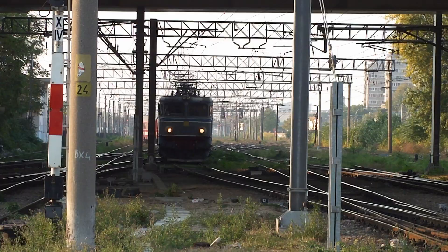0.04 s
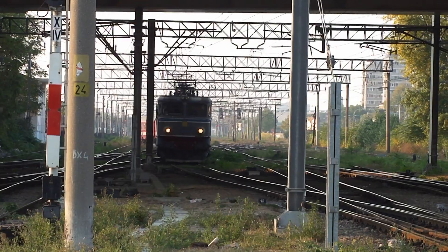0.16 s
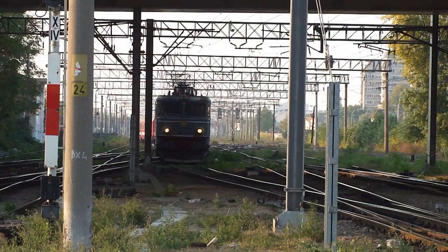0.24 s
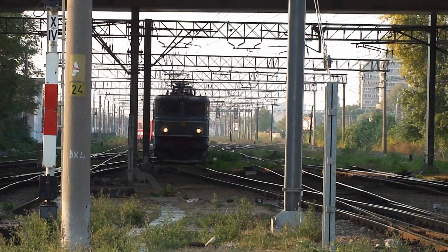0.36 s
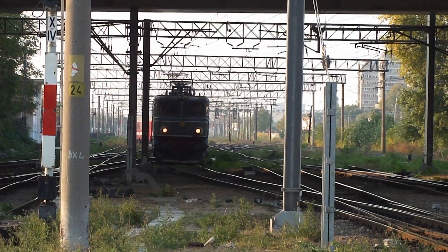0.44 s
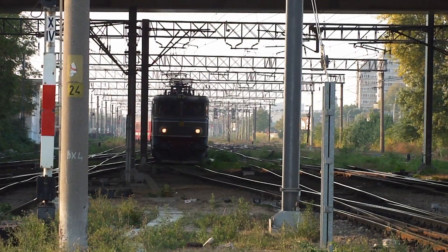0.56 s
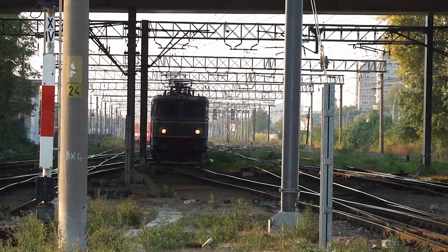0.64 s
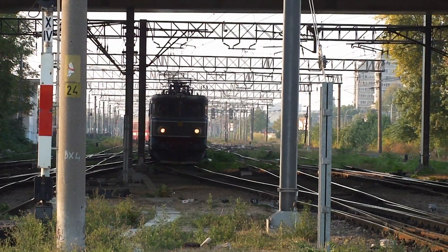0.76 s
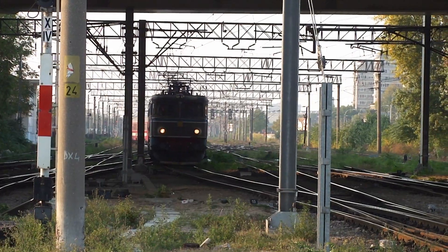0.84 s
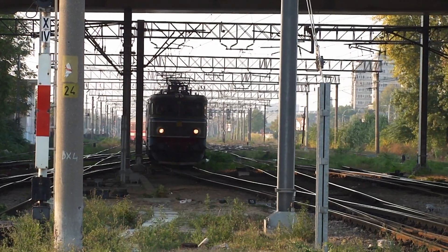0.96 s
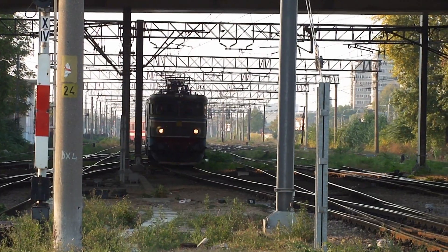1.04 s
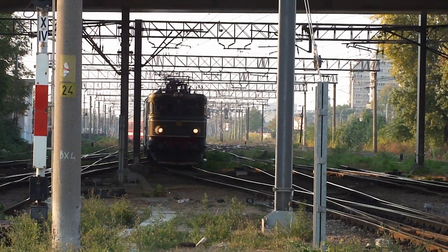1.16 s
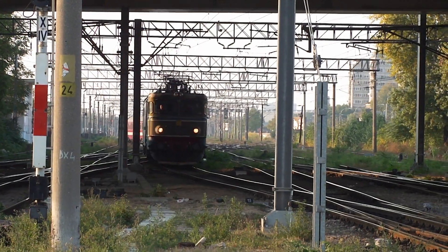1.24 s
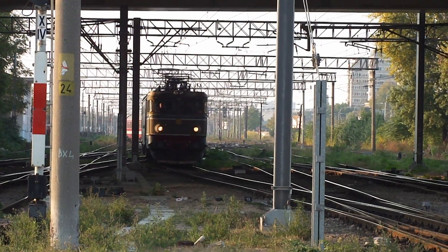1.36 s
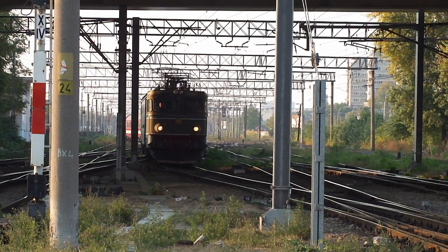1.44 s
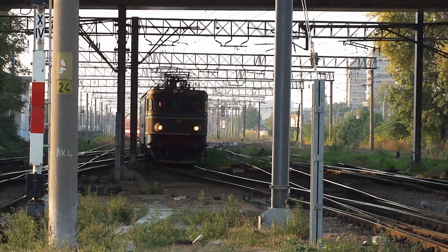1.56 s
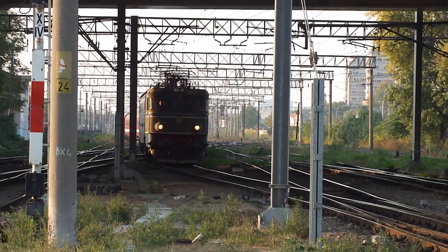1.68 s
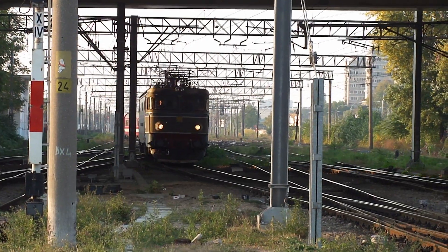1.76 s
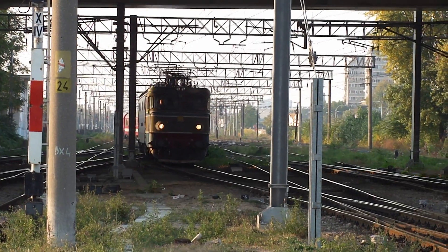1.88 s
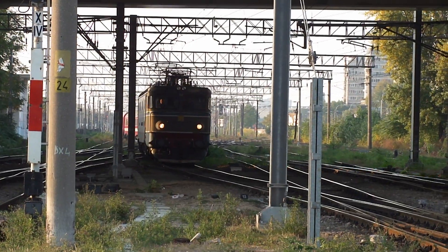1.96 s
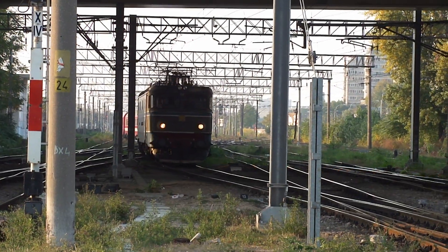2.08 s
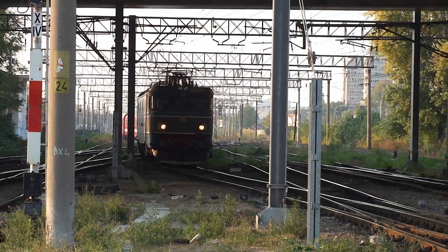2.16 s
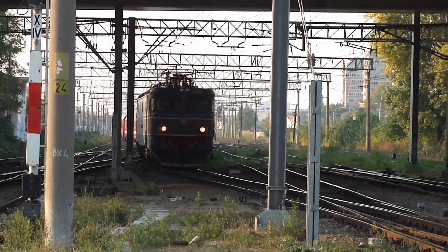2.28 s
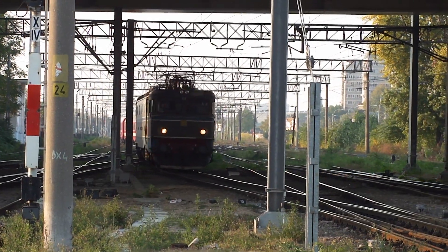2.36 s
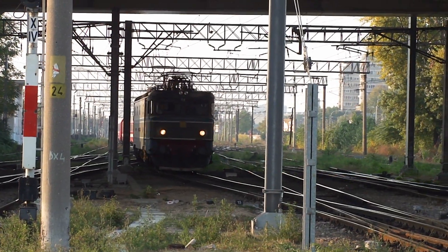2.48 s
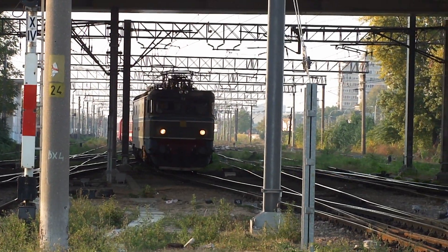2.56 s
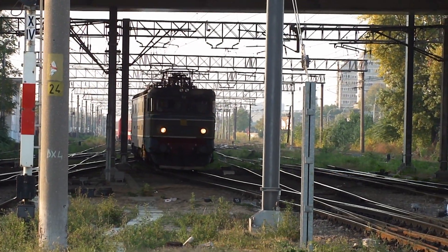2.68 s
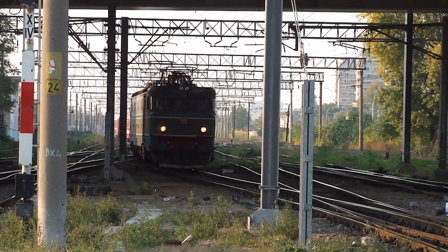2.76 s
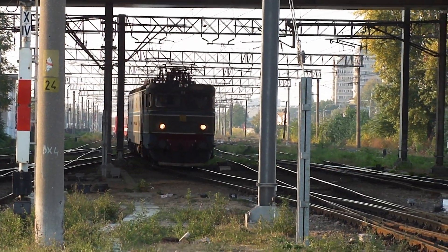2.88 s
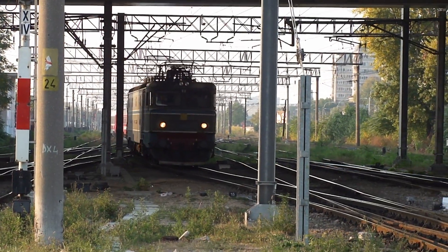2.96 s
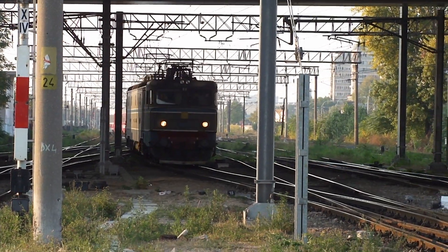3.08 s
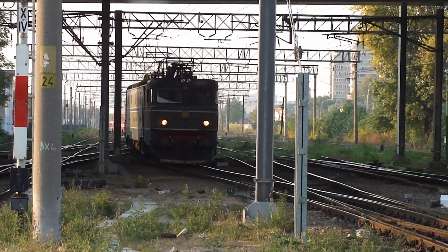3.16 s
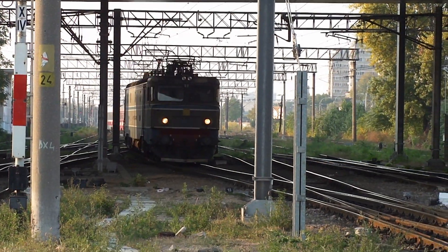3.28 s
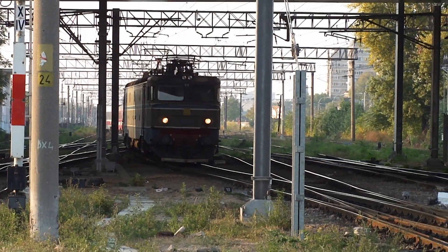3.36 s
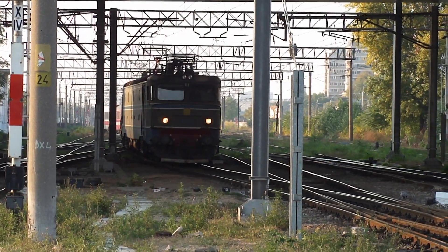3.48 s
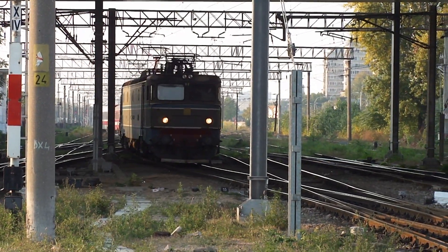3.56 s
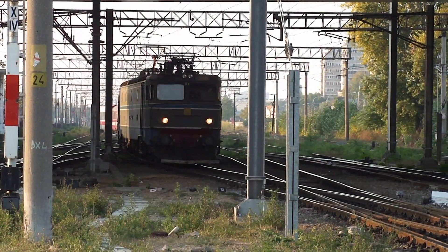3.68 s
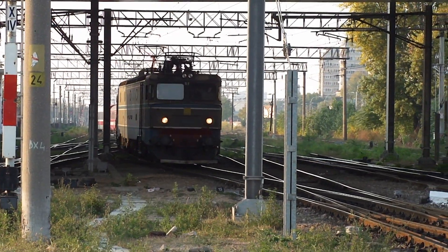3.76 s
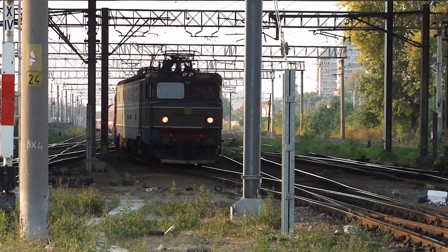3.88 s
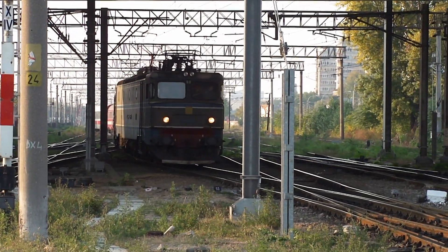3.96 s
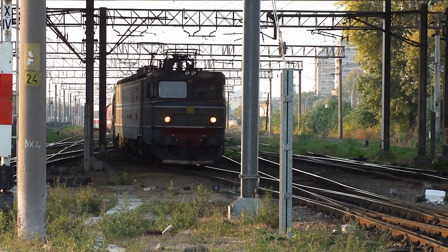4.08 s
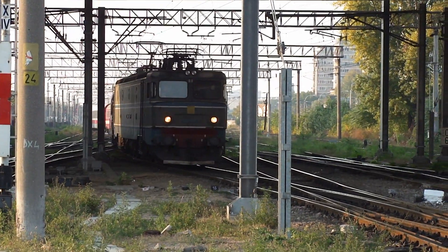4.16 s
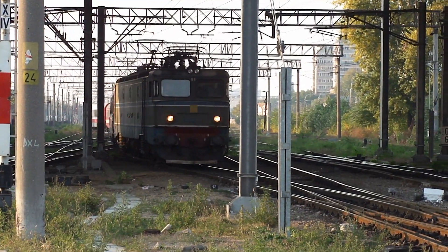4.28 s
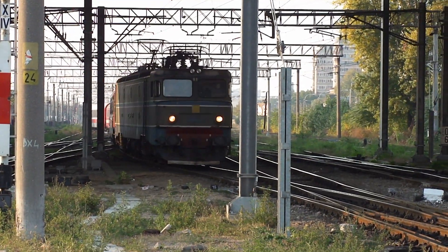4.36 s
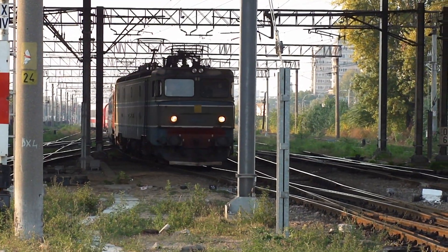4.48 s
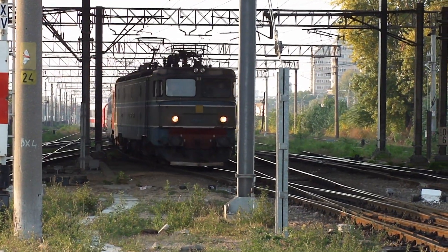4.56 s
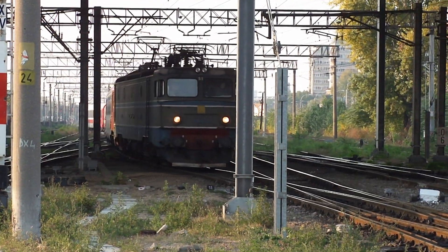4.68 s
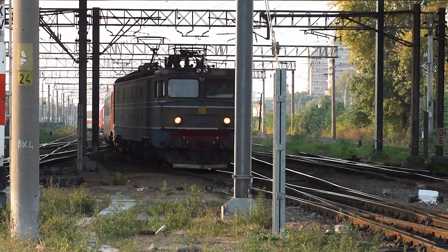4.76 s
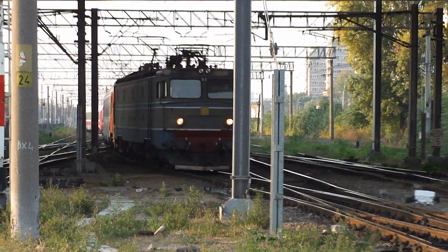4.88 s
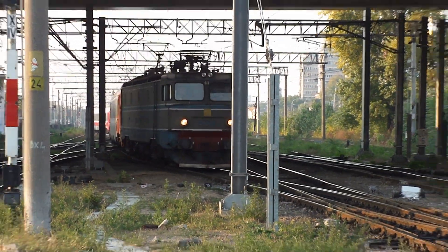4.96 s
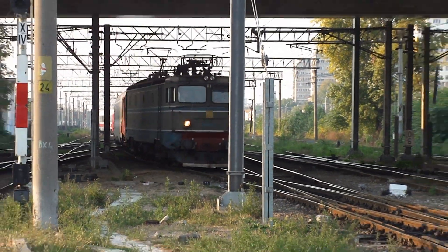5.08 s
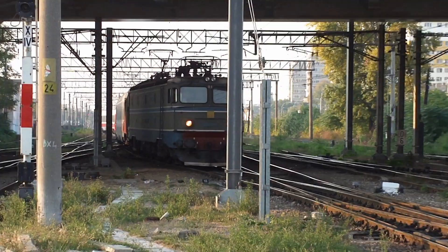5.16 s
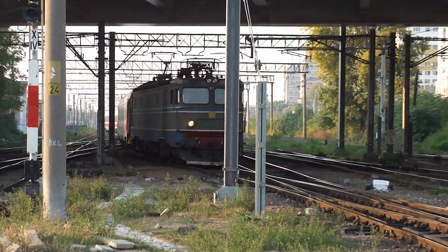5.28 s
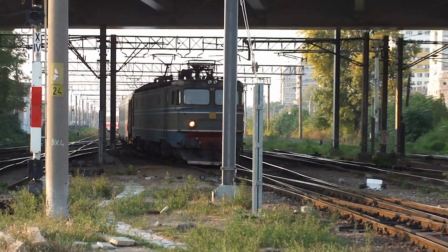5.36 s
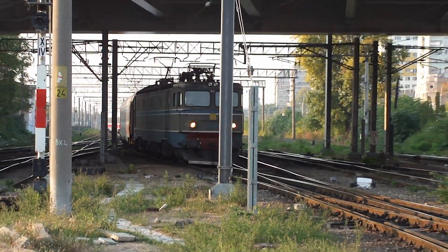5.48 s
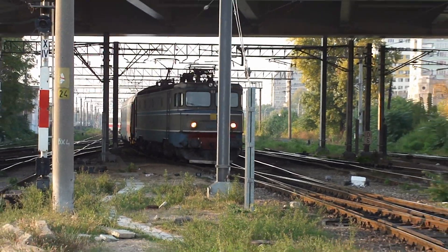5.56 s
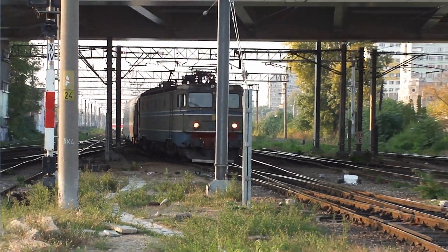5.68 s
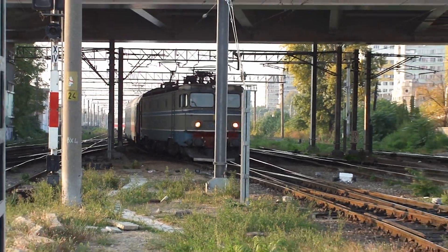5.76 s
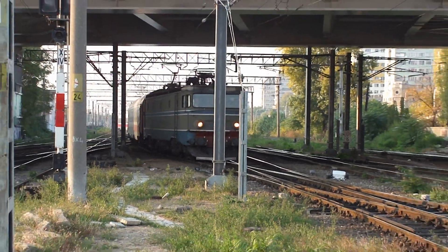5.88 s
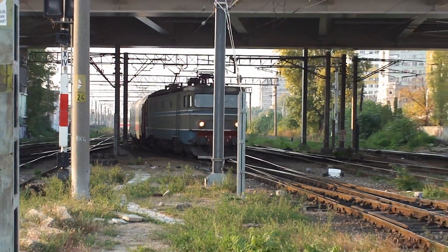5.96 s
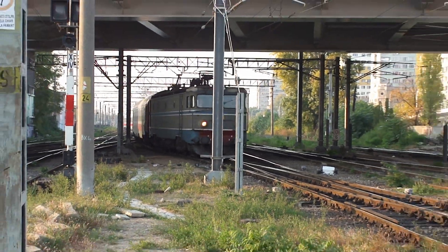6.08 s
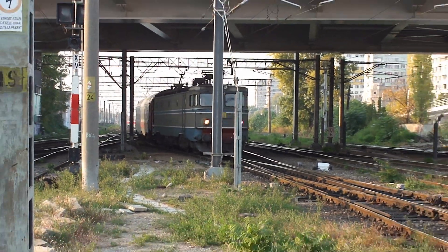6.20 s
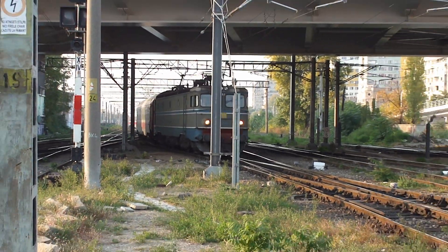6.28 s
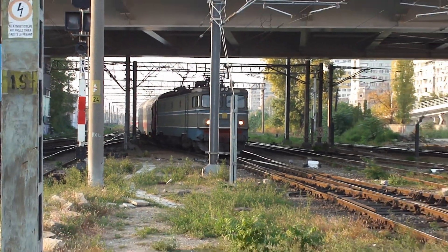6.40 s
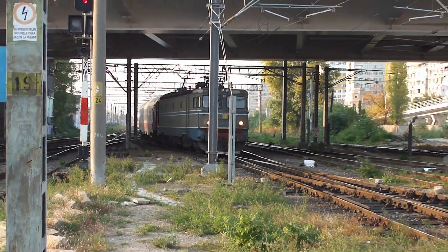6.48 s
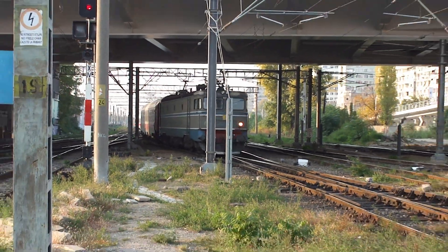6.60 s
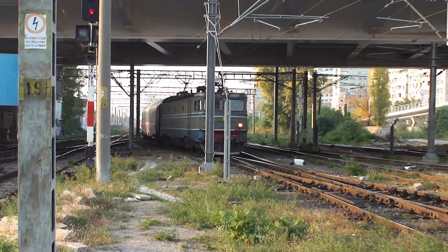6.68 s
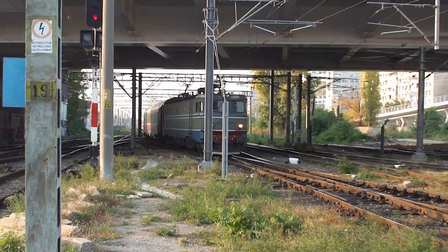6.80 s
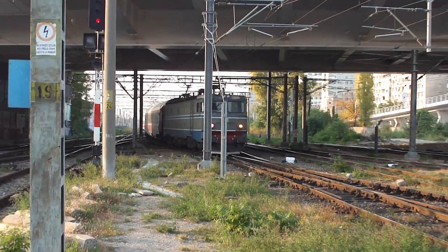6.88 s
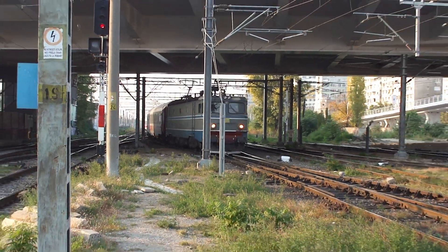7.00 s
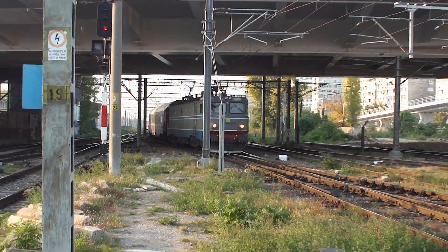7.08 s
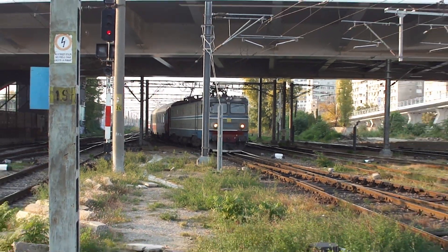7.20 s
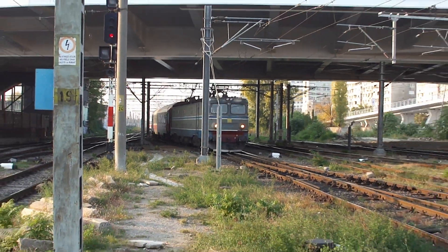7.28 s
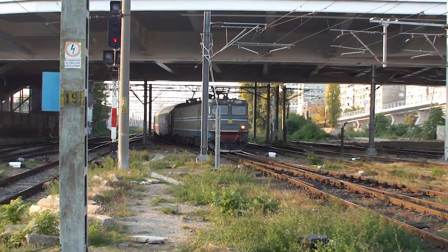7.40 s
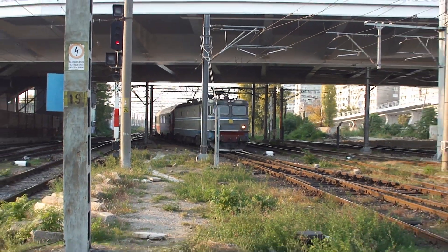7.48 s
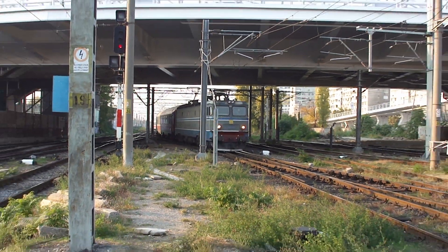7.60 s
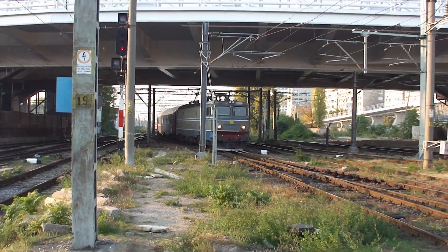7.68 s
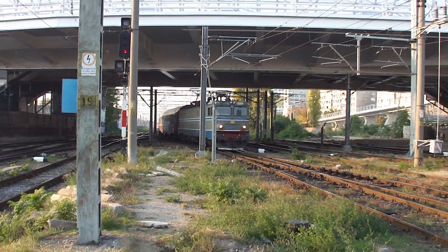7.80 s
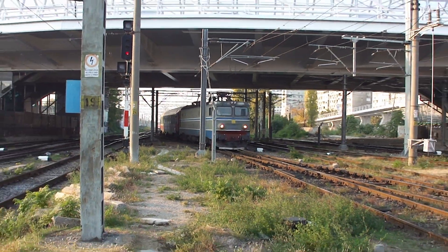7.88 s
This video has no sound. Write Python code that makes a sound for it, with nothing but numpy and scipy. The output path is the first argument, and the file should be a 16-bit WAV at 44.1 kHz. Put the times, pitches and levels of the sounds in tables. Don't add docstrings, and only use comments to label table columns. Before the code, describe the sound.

A slow electric locomotive rumbles and roars steadily closer under a road bridge, with flange hiss, faint chirps, metallic clanks and a thin left-side buzz.

```python
import sys
import numpy as np
from scipy import signal
from scipy.fft import rfft, irfft, next_fast_len
from scipy.io import wavfile
from scipy.ndimage import uniform_filter1d, map_coordinates

SR = 44100
rng = np.random.default_rng(int(sys.argv[2]) if len(sys.argv) > 2 else 0)


def transcribe(signal):
    frames = np.atleast_2d(signal).T
    limited = np.clip(frames, -1, 1)
    pcm = np.round(limited * 32767).astype(np.int16)
    wavfile.write(sys.argv[1], SR, pcm)


def volts_from_db(level):
    exponent = np.asarray(level, float) / 20
    return 10 ** exponent


N = 349933

# t/s, loudness over the start/dB
NEARNESS = [(0, 0), (.7, 0.15), (1.4, 1.1), (1.8, 2), (2.6, 2.5), (3.3, 3), (4.1, 4), (4.4, 5), (5.1, 5.5),
            (5.8, 6), (6.3, 7), (6.9, 8), (7.5, 8), (7.93, 9)]
# t/s, peak level/dB, centre f/Hz, left minus right/dB, added rub/dB
CLANKS = [(0.5866, -37, 5530, 4.0, 1), (0.9494, -43, 5760, 6.0, 2), (1.52, -42, 5700, 11, 1),
          (1.9194, -52, 5670, 4.5, 4), (2.0223, -45, 6220, -3, 1), (2.1111, -39, 5780, 10, .3),
          (2.1894, -36, 7500, 8, 1), (2.6194, -54, 7820, 8, 1.5), (3.05, -48, 5800, 5, 0.5),
          (3.2794, -44, 5920, 3.0, 1.5), (3.8294, -44, 6310, 4.0, 2.5), (3.907, -45, 9600, 3.5, -0.3),
          (4.2827, -33, 6580, 1, 4), (4.9302, -33, 6190, 10, 1), (5.9738, -31, 6720, 8, 1.5),
          (6.259, -27, 7000, 3.0, 5), (6.6194, -37, 6670, 3.5, 4), (6.9494, -37, 6610, 4.0, 3),
          (7.44, -44, 6000, 5, 1.5), (7.8, -46, 6000, 3, 0)]
# f/Hz, level/dB
HISS_SHAPE = [(4700, -49), (5100, -7), (5600, 1), (6500, 0), (7500, -3.5), (9000, -8), (10500, -17.5),
              (11500, -29), (12000, -58)]
# t/s, level/dB
LENS_MOTOR = [(4.92, -95), (4.935, -52), (5.3, -52.5), (7.93, -56)]


def unit(x):
    return x / np.sqrt(np.mean(x ** 2) + 1e-20)


def along(points, hz):
    f, v = np.transpose(points)
    return np.interp(np.log(hz + 1), np.log(f + 1), v)


def spectrum(points):
    return lambda hz: volts_from_db(along(points, hz))


def curves(rows):
    s, *cols = np.transpose(rows)
    return [np.interp(np.arange(N) / SR, s, c) for c in cols]


def wobble(rate_hz):
    knots = rng.standard_normal(int(N * rate_hz / SR) + 4)
    return map_coordinates(knots, [np.arange(N) * rate_hz / SR])


def filtered(x, response):
    m = next_fast_len(N + SR // 4)
    return irfft(rfft(x, m) * response(np.fft.rfftfreq(m, 1 / SR)), m)[..., :N]


def rush(gain, alike, patchy_db):
    z = signal.stft(rng.standard_normal((2, N)), nperseg=512)[2]
    field = uniform_filter1d(rng.standard_normal(z.shape[1:]), size=4, axis=0)
    field = uniform_filter1d(field, size=16, axis=1)
    pair = signal.istft(z * volts_from_db(patchy_db * unit(field)), nperseg=512)[1][:, :N]

    def mid_side(hz):
        turn = np.arccos(np.clip(along(alike, hz), -1, 1)) / 2
        return gain(hz) * [np.cos(turn), np.sin(turn)]

    mid, side = filtered(pair, mid_side)
    return np.array([mid + side, mid - side]) / np.std(mid)


def pan(db):
    return volts_from_db(np.array([db / 2, -db / 2]))


def jolts():
    rub_s = 0.1
    s = np.arange(N) / SR
    return sum(rub_db * (s > at) * np.exp(-abs(s - at) / rub_s) for at, _, _, _, rub_db in CLANKS)


def rolling():
    # f/Hz, level per Hz/dB
    bogie = [(20, -59), (50, -21.5), (90, -13), (170, -2.5), (215, -0.5), (320, 0), (400, -3), (600, -67)]
    rail = [(220, -56.5), (330, -8.5), (460, -1), (520, -1), (600, 0), (645, 1), (700, -0.5), (855, -0.5),
            (885, -14), (1100, -56.5)]
    wheel_web = [(700, -55), (870, -6), (940, -2.5), (1080, -0.5), (1220, -2.5), (1330, -5.5), (1430, -10),
                 (1700, -62.5)]
    wheel_rim = [(1150, -68), (1400, -5), (1550, -1), (1730, 0), (1920, -1.5), (2020, -4.5), (2450, -12.5),
                 (2800, -24.5), (3400, -61)]
    # start level/dB, growth per dB of nearness [dB/dB], left minus right/dB
    body_levels = [
        (-40, 0.5642, 1.8),
        (-31.5, 1.0, 1.75),
        (-33.5, 0.9951, 2),
        (-35.5, 0.86, 1),
    ]
    # f/Hz, left-right likeness [-1..1]
    likeness = [(25, .6), (60, 1), (130, 0.98), (560, 1), (1180, 0.96), (2500, 0.91)]
    # f/Hz, width/Hz, start level/dB, growth per dB of nearness [dB/dB]
    tones = [
        (198.8, 10, -53.5, 0.82),
        (455.4, 18, -52.5, 1.0),
        (635.7, 19, -47.5, 0.96),
        (851.8, 8.6, -54, 1.5),
        (1935, 24, -56, 1.5),
    ]
    # middle t/s, half length/s, gain/dB
    tone_spells = [
        [(1.72, 0.072, 6.5), (4.33, 0.073, 11), (6.76, .15, 9.5), (7.44, .08, 6)],
        [(.66, .1, 14), (6.56, .06, 5), (7.25, 0.12, 5), (7.66, 0.16, 15)],
        [(1.7, .06, 7), (5.03, 0.086, 7.5), (6.48, 0.34, 12), (7.36, 0.1, 15), (7.7, 0.17, 10.5)],
        [(3.0, .3, 7.5), (5.21, 0.071, 9), (6.8, 0.11, 9), (7.1, 0.29, 11), (7.9, .06, 3)],
        [(1.6, 0.1, 12), (5.0, 0.13, 12), (6.0, 0.12, 9), (7.62, 0.13, 11)],
    ]

    near_db, = curves(NEARNESS)
    roar = np.zeros((2, N))
    jolt_shares = (1, .2, .1, .1)
    for (db, grows, lean_db), body, share in zip(body_levels, (bogie, rail, wheel_web, wheel_rim), jolt_shares):
        uneven_db = 0.09 * wobble(5)
        level = volts_from_db(db + grows * near_db + uneven_db + share * jolts())
        roar += level * pan(lean_db)[:, None] * rush(spectrum(body), likeness, patchy_db=0.7)

    s = np.arange(N) / SR
    for (mode_hz, width_hz, db, grows), spells in zip(tones, tone_spells):
        sing_db = sum(gain_db * np.exp(-((s - at) / half_s) ** 4) for at, half_s, gain_db in spells)
        resonance = lambda hz: 1 / (1 + ((hz - mode_hz) * 2 / width_hz) ** 2)
        mode = unit(filtered(rng.standard_normal(N), resonance))
        waver_db = 1.5 * wobble(4)
        roar += volts_from_db(db + grows * near_db + sing_db + waver_db) * mode * pan(1.4)[:, None]
    return roar


def glide(rows, blur_hz, steady=0):
    hz, db = curves(rows)
    s = np.arange(N) / SR
    inside = uniform_filter1d(1. * (s > rows[0][0]) * (s < rows[-1][0]), size=400)
    phase = 2 * np.pi * np.cumsum(hz) / SR
    tone = (steady + wobble(blur_hz)) * np.sin(phase) + wobble(blur_hz) * np.cos(phase)
    return inside * volts_from_db(db) * unit(tone)


def arc(start_s, length_s, low_hz, top_hz, db):
    swing_s, fade_db = .97, 12
    u = np.linspace(0, 1, 30)
    hz = low_hz + (top_hz - low_hz) * np.sin(np.pi * u * length_s / swing_s) ** 2
    return np.transpose([start_s + u * length_s, hz, db - fade_db * (2 * u - 1) ** 4])


def flanges():
    # f/Hz, level/dB
    grit_shape = [(2400, -26.5), (2900, 0), (3500, 1.5), (4500, -3.5), (5200, -6), (5700, -39.5)]
    # start t/s, length/s, low f/Hz, top f/Hz, level/dB
    chirps = [
        (.93, .77, 8300, 9750, -67.5),
        (1.8, .2, 8500, 9600, -75),
        (2.8, .26, 10300, 11500, -76),
        (3.2, .5, 8800, 9450, -69.5),
        (3.8, .3, 9900, 11000, -81),
    ]
    # start t/s, length/s, level/dB
    squeak_bursts = [
        (5.96, .045, -57),
        (6.25, .17, -54),
        (6.615, .15, -52.5),
        (6.93, .21, -54.5),
    ]

    near_db, = curves(NEARNESS)
    rub_db = jolts()
    shake = volts_from_db(0.49 * wobble(9) + 0.44 * wobble(45))

    fizz_level = volts_from_db(-58 + .95 * near_db + rub_db) * pan(4 + .8 * wobble(10))
    fizz_alike = [(5200, .6), (8000, 0.49), (11000, .2)]
    fizz = fizz_level * rush(spectrum(HISS_SHAPE), fizz_alike, patchy_db=0.6)

    grit_level = volts_from_db(-59.5 + 0.75 * near_db + .7 * rub_db + 0.43 * wobble(11)) * pan(1.2)[:, None]
    grit = grit_level * rush(spectrum(grit_shape), [(3000, 0.83), (5000, .5)], patchy_db=0.55)

    arcs = [arc(*c) for c in chirps]
    thin = sum(np.array([glide(c, blur_hz=300), glide(c, blur_hz=300)]) for c in arcs)
    thin = thin * volts_from_db(1.5 + 3 * wobble(45))
    halo = sum(np.array([glide(c, blur_hz=1500), glide(c, blur_hz=1500)]) for c in arcs) * volts_from_db(2)

    squeak_hz = 6665
    bursts = sum(glide([(at, squeak_hz, db), (at + length_s, squeak_hz, db)], blur_hz=200, steady=.5)
                 for at, length_s, db in squeak_bursts)
    squeaks = bursts * volts_from_db(2.3 * wobble(35)) * pan(3.5)[:, None]
    return shake * (fizz + grit) + thin + halo + squeaks


def electronics():
    # f/Hz, level per Hz/dB
    motor_shape = [(5000, -31), (5400, 4), (5800, -3.5), (8000, -10), (10000, -13), (11000, -12.5),
                   (11800, -26)]
    # f/Hz, level/dB
    whine_tones = [
        (7800, -73),
        (7825, -73),
    ]

    frame_hz = 50
    ticks, s = np.zeros(N), np.arange(N) / SR
    ticks[np.round(np.arange(0, N - 1, SR / frame_hz)).astype(int)] = 1
    puffs = np.convolve(ticks, volts_from_db(-60 * s[:300] / .004))[:N] * rng.standard_normal(N)
    buzz = volts_from_db(-61.5) * unit(filtered(puffs, spectrum(HISS_SHAPE)))
    lens = volts_from_db(curves(LENS_MOTOR)[0]) * unit(filtered(rng.standard_normal(N), spectrum(motor_shape)))
    whine = sum(np.sqrt(2) * volts_from_db(db + 5.5 + 2.5 * wobble(8)) * np.sin(2 * np.pi * hz * s)
                for hz, db in whine_tones)
    return np.array([buzz + whine + lens, 0 * s])


def joints():
    crack_t60_s, tail_t60_s = 0.028, 0.18
    out, t = np.zeros((2, N + SR)), np.arange(SR // 4) / SR
    for s, db, hz, lean_db, _ in CLANKS:
        decay = volts_from_db(-60 * t / crack_t60_s) + 0.49 * volts_from_db(-60 * t / tail_t60_s)
        burst = rng.standard_normal((2, len(t))) * decay
        colour = signal.butter(2, [hz * 0.84, min(hz * 1.22, 11600)], "bandpass", fs=SR, output="sos")
        clank = volts_from_db(db - 4.5) * pan(lean_db)[:, None] * signal.sosfilt(colour, burst)
        out[:, round(s * SR):][:, :len(t)] += clank
    return out[:, :N]


def scene():
    return rolling() + flanges() + electronics() + joints()


def band_gate(x):
    # f/Hz, level re the 6 kHz hiss/dB
    threshold = [(100, -60), (2600, -30), (3000, -11), (4000, -17), (5000, -18), (5600, -22), (9500, -22),
                 (10700, -22), (11300, -21)]

    hz, t, z = signal.stft(x, SR, nperseg=2048, window="cosine")
    bins = 5
    band = np.arange(len(hz)) // bins
    power = uniform_filter1d(abs(z) ** 2, size=bins, axis=1)[:, bins // 2::bins]
    hiss = np.mean(abs(z[:, (hz > 5600) & (hz < 7000)]) ** 2, axis=1, keepdims=True)

    slow = unit(uniform_filter1d(rng.standard_normal(power.shape[1:]), size=3, axis=1))
    drift_db = .8 * rng.standard_normal((2, 1, len(t))) + 3.5 * slow
    floor_db = along(threshold, hz[bins // 2::bins])[:, None] + drift_db
    kept = power > hiss * volts_from_db(floor_db) ** 2

    edge_hz, flicker_hz, settled_hz = 11000, 420, 700
    jitter = rng.standard_normal(len(t))
    before_motor = t < LENS_MOTOR[0][0]
    edge = edge_hz + np.where(before_motor, flicker_hz * jitter, settled_hz * np.maximum(jitter - .7, 0))
    z = z * (hz[:, None] < edge)
    return signal.istft(z * kept[:, band], SR, nperseg=2048, window="cosine")[1][:, :N]


def low_pass(x):
    return signal.sosfilt(signal.butter(12, 11630, fs=SR, output="sos"), x)


def record(dry):
    # f/Hz, width/Hz
    notch_filters = [(2975, 120), (3050, 240), (3970, 430), (4065, 390), (4975, 330), (5085, 370)]

    def response(hz):
        late = np.exp(np.array([[-1j], [1j]]) * np.pi * hz * 1.14 / SR)
        notches = np.prod([(c * c - hz * hz + .26j * hz * w) / (c * c - hz * hz + 1j * hz * w)
                           for c, w in notch_filters], axis=0)
        treble = 1 / (1 + (hz / 11700) ** 60)
        return late * notches * treble

    return low_pass(band_gate(filtered(dry, response)))


dry = scene()
out = record(dry)
transcribe(out)
```